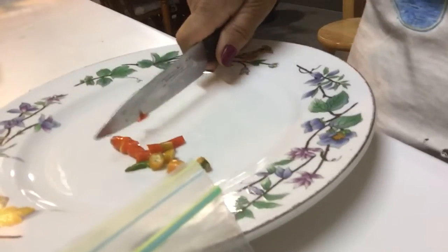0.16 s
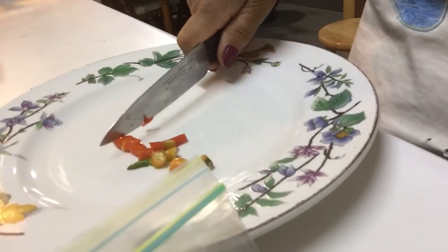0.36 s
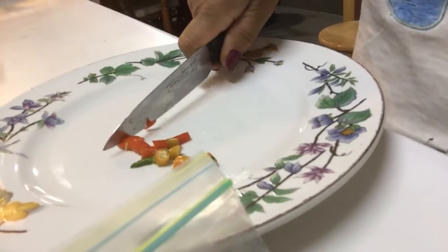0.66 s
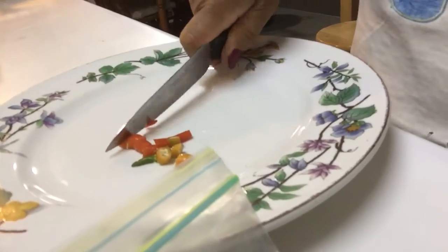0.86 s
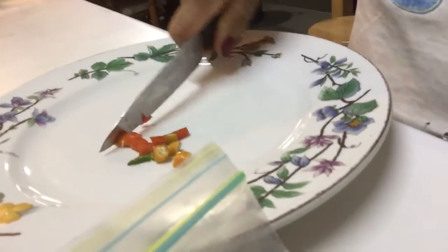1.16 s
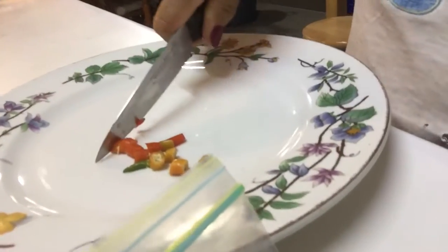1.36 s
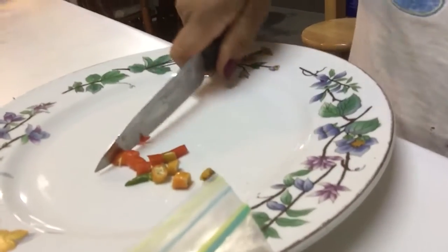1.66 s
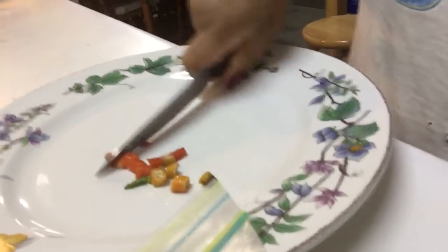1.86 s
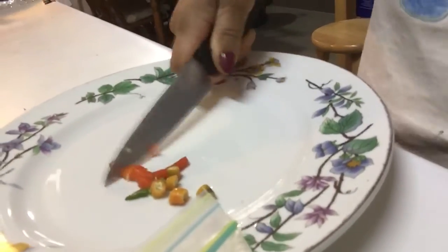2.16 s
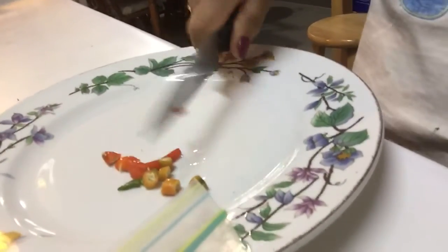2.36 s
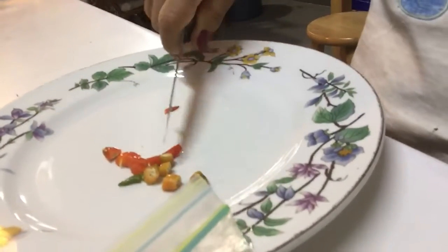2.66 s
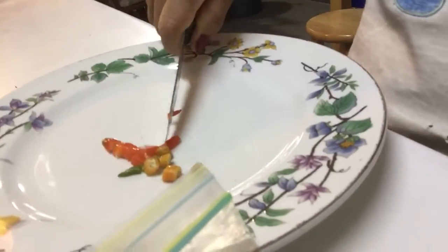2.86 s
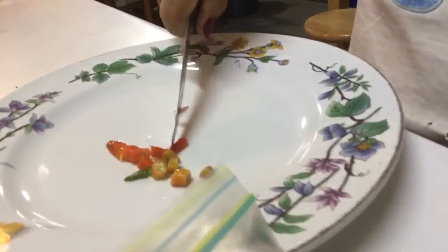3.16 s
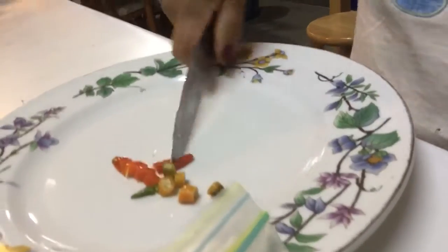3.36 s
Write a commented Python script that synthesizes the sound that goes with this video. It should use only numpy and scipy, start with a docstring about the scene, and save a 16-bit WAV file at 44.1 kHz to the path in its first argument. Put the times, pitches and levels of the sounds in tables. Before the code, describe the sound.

A kitchen knife cuts chili on a porcelain plate, three sharp ringing clacks with faint scrapes between

```python
"""A kitchen knife cuts a chili on a porcelain plate that stands on a table in a small kitchen.
Three times the blade breaks through and hits the plate: decaying sines ring for blade and glaze, the table thuds.
In between the tip ticks and scrapes (grains of friction convolved with a touch), and the chili rasps as
band-passed grains. At MOVE_S the knife moves from the chili's tip to the plate's middle.
Noise gives the room tone and reverberation; the close microphone overloads on the two hardest hits."""
import sys
import numpy as np
from scipy import signal
from scipy.fft import rfft, irfft
from scipy.io import wavfile

SR = 44100
rng = np.random.default_rng(int(sys.argv[2]) if len(sys.argv) > 2 else 0)


def dump_mix(stems):
    """Bounce the given channels to the path in sys.argv[1] as a 16-bit WAV at rate SR."""
    frames = np.atleast_2d(stems).T  # one column per channel
    limited = np.clip(frames, -1, 1)  # hard clip at full scale
    pcm = np.round(limited * 32767).astype(np.int16)
    wavfile.write(sys.argv[1], SR, pcm)


N = 154350
T = np.arange(SR // 2) / SR  # half a second for every ring and tail

# spectrum of the steady air, only its shape counts: pitch_hz [Hz], density_db [dB per Hz]
AIR_SPECTRUM = [(15, -42.5), (25, -11.5), (48, -11.5), (86, -4.5), (126, -3), (260, -7), (359, 0),
                (389, -7), (421, -8.5), (762, -17), (945, -17.5), (1800, -21), (5730, -27), (15500, -37)]
AIR_DB, HUM_DB = -66, -80
HUM_HZ, HUM_WIDTH_HZ = 357.2, 8

# kitchen reverberation: pitch_hz [Hz], level_db [dB against the direct sound], t60_s [s]
ROOM_REVERB = [(99.5, -23, .35), (400, -13.5, .35), (1000, -17.5, 0.17), (1980, -27.5, 0.5),
               (4000, -24, 0.16), (8000, -21.5, 0.32), (15000, -18.5, 0.11)]
ROOM_DELAY_S, EARLY_DB, EARLY_T60_S = 0.006, -2.5, 0.03  # EARLY_DB is against the late tail

# the table's boom: pitch_hz [Hz], level_db [dB], t60_s [s]
TABLE_MODES = [(56.3, -2.5, .16), (74, 3, 0.15), (110, -1, .13), (145, -5.5, 0.18)]
# the plate's low knock: pitch_hz [Hz], level_db [dB], t60_s [s]
KNOCK_MODES = [(265, 1.5, .09), (454, 4, .028), (530, -4, .025), (680, 0, .032), (1214, 0.5, 0.014),
               (1380, -2, .02)]
# the hand's weight goes through the plate into the table:
# start_s [s], boom_db [dB], boom_edge_hz [Hz], knock_db [dB]
TABLE_THUDS = [(0.0, -52, 70.6, -78), (0.7148, -34, 198, -34), (1.562, -60, 72, -75),
               (1.813, -40.5, 51, -77), (1.9815, -28.5, 405, -26.5), (2.225, -41.5, 69.4, -58.5),
               (2.873, -50, 90.3, -61.5), (3.302, -24, 90, -29)]
THUD_RISE_CYCLES = 0.61

# skin and flesh of the chili rasp along the blade:
# start_s [s], length_s [s], level_db [dB], low_edge_hz [Hz], high_edge_hz [Hz]
CHILI_RASPS = [(0.702, .02, -48, 500, 1900), (0.702, .026, -66, 9500, 16000), (0.845, .06, -67, 1100, 3500),
               (1.97, .12, -53, 1000, 2500), (2.155, .085, -59, 700, 2600), (2.2, .1, -65, 3500, 8500),
               (2.212, .065, -67, 8000, 15500), (3.273, .026, -59, 1200, 3500),
               (3.28, .23, -56, 1500, 4000)]
RASP_GRAINS_PER_S = 3000

# the plate's ringing modes:
# pitch_hz [Hz], tip_db [dB, touched at the chili's tip], middle_db [dB, touched near the middle], t60_s [s]
PLATE_MODES = [(1760, -13, -11.5, 0.041), (2165, -12.5, -14, 0.046), (2565, -22, -14.5, .03),
               (2763.4, -2.5, -3.5, 0.048), (3344, -12.5, -9.5, 0.031), (3677, -22.5, -16, .035),
               (3934, -16, -14, 0.06), (4170, -23, -9.5, .025), (4362, -12, -7.5, .035),
               (4750, -24, -24, .05), (5800, -9.5, -20.5, .055), (6103, -20, -17, .035),
               (7760, -18, -29, .05), (8040, -18, -26, 0.037), (9950, -27, -29, .035),
               (10720, -26.5, -30, .035), (11880, -30, -25, .05)]
MOVE_S = 2.5
BLADE_RISE_S, PLATE_RISE_S = 0.00067, 0.00077
CRACK_DB, CRACK_T60_S = -8.5, 0.0083

# the blade lands on the plate:
# start_s [s], level_db [dB], blade_pitch_hz [Hz], blade_t60_s [s], plate_ring_db [dB], contact_edge_hz [Hz]
BLADE_STRIKES = [(0.7086, -26.5, 2110, .03, -6, 2520), (0.7128, -25, 1976, 0.039, 2, 6500),
                 (1.9707, -16, 2072, 0.06, -11.5, 3500), (1.98, 7, 1934, 0.027, -22.5, 12400),
                 (2.8701, -31.5, 1970, 0.038, -2, 2300), (3.2775, -35.5, 1980, 0.026, -1, 3500),
                 (3.2963, -5, 2065, 0.029, -1.5, 2440), (3.3011, 13.5, 1943, 0.016, -12.5, 12000)]
# the tip slips a little under pressure: start_s [s], level_db [dB]
TIP_TICKS = [(0.8315, -37.5), (0.8648, -30), (0.8755, -40), (0.8895, -49), (0.9255, -46.5), (1.2173, -33.5),
             (1.2355, -40.5), (1.555, -40), (1.7042, -39), (1.7466, -36.5), (1.7545, -35.5), (1.9571, -33),
             (2.2385, -28.5), (2.2659, -55.5), (2.9715, -37), (3.0187, -42.5), (3.1469, -43.5),
             (3.1654, -42), (3.1923, -39.5), (3.2038, -37.5)]
TICK_HZ, TICK_HZ_SPREAD = 1949, 0.01239  # spread as a fraction of the pitch
TICK_T60_S, TICK_PLATE_DB, TICK_EDGE_HZ = 0.019, -16.5, 5000
# the edge drags over the glaze:
# start_s [s], length_s [s], level_db [dB], plate_ring_db [dB], contact_edge_hz [Hz]
EDGE_SCRAPES = [(0.544, 0.25, -70.5, -5.5, 3550), (0.697, 0.019, -36.5, -5.5, 3080),
                (0.787, .18, -59, -9.5, 3980), (1.221, 0.13, -76, -9, 2510), (1.727, 0.079, -58, -9, 3280),
                (1.782, 0.48, -66, -7, 2500), (2.067, .08, -55, -15.5, 2500),
                (2.202, 0.086, -50, -10.5, 7105), (2.923, .17, -63.5, -4, 3940),
                (3.091, 0.21, -62.5, -4.5, 4400)]
SCRAPE_HZ, SCRAPE_T60_S, SCRAPE_GRAINS_PER_S = 1927, 0.026, 2400
GRAIN_SPREAD_DB, CLUMPS_PER_S, CLUMP_DB = 4.5, 110, 2.6

OVERLOAD = 1.0  # ceiling of the flattened peaks, full scale
TREBLE_STOP_HZ = 17000


def from_db(db):
    """Decibels to gain."""
    return 10 ** (np.asarray(db) / 20)


def rms_one(x):
    """Scale to unit rms."""
    return x / np.sqrt(np.mean(x ** 2) + 1e-20)


def at_level(x, length_s, db):
    """Give a stroke its rms level, its energy averaged over length_s."""
    mean_square = np.sum(x ** 2) / (length_s * SR)
    return from_db(db) * x / np.sqrt(mean_square + 1e-20)


def add(out, start_s, x):
    """Mix x into out from start_s on."""
    i = max(int(start_s * SR), 0)
    out[i:i + len(x)] += x[:N - i]


def fade(t60):
    """Exponential decay that loses 60 dB in t60 seconds."""
    return np.exp(-np.log(1000) * T / t60)


def mode(hz, t60, rise_s):
    """A resonance that swells quickly and dies away."""
    swell = 1 - np.exp(-T / rise_s)
    return np.sin(2 * np.pi * hz * T) * fade(t60) * swell


def soften(x, edge_hz):
    """A softer contact carries less treble."""
    low_pass = signal.butter(2, min(edge_hz, 0.45 * SR), fs=SR, output="sos")
    return signal.sosfilt(low_pass, x + 1e-18)


def band(x, low_hz, high_hz):
    """Keep the band between two edges."""
    band_pass = signal.butter(3, [low_hz, min(high_hz, 0.48 * SR)], "band", fs=SR, output="sos")
    return signal.sosfilt(band_pass, x)


def at_hz(points, hz, axis=1):
    """Read a column of a table on a log-frequency axis."""
    points = np.array(points)
    return np.interp(np.log(hz + 1e-9), np.log(points[:, 0]), points[:, axis])


def room_tone():
    """Steady air as shaped noise, with the faint hum of an appliance as a narrow band of noise."""
    hz = np.arange(N // 2 + 1) * SR / N
    air_bins, hum_bins = rfft(rng.standard_normal((2, N)))
    air = irfft(air_bins * from_db(at_hz(AIR_SPECTRUM, hz)), N)
    hum = irfft(hum_bins / (1 + ((hz - HUM_HZ) / HUM_WIDTH_HZ) ** 2), N)
    return from_db(AIR_DB) * rms_one(air) + from_db(HUM_DB) * rms_one(hum)


def kitchen(direct):
    """Dense early reflections and a tail that dies at its own pace in each octave."""
    response = 0
    edges_hz = 40 * 2.0 ** np.arange(10)
    early = fade(EARLY_T60_S)
    early = from_db(EARLY_DB) * early / np.linalg.norm(early)
    for low_hz, high_hz in zip(edges_hz, edges_hz[1:]):
        centre_hz = np.sqrt(low_hz * high_hz)
        late = fade(at_hz(ROOM_REVERB, centre_hz, axis=2))
        shape = late / np.linalg.norm(late) + early
        octave_noise = band(rng.standard_normal(len(T)), low_hz, high_hz)
        response = response + from_db(at_hz(ROOM_REVERB, centre_hz)) * octave_noise * shape
    out = np.zeros(N)
    add(out, ROOM_DELAY_S, signal.fftconvolve(direct, response))
    return out


def thud_body(modes):
    """Sum the modes of a heavy body; low ones swell more slowly."""
    return sum(from_db(db) * mode(hz, t60, THUD_RISE_CYCLES / hz) for hz, db, t60 in modes)


def table():
    """Each push makes the table boom; a sudden one also knocks the plate against it."""
    out = np.zeros(N)
    boom = thud_body(TABLE_MODES)
    knock = thud_body(KNOCK_MODES)
    for start_s, boom_db, edge_hz, knock_db in TABLE_THUDS:
        thud = from_db(boom_db) * soften(boom, edge_hz) + from_db(knock_db) * knock
        add(out, start_s, thud)
    return out


def friction(length_s, grains_per_s, taper=1.4):
    """Tiny slips of uneven size that come in clumps, swelling and fading over one stroke."""
    n = int(length_s * SR)
    chance, size, sign = rng.random((3, len(T)))[:, :n]
    clumps = rng.standard_normal(size=200)
    clumps = np.interp(T[:n] * CLUMPS_PER_S, np.arange(len(clumps)), clumps)
    grain_db = GRAIN_SPREAD_DB * np.minimum(-np.log(size + 1e-9), 3)  # few large, many small
    slips = from_db(grain_db + CLUMP_DB * clumps) * np.sign(sign - 0.5)
    grains = (chance < grains_per_s / SR) * slips + 1e-9
    return grains * np.sin(np.pi * np.arange(n) / n) ** taper


def chili():
    """Fine crackle as the blade passes through skin and flesh."""
    out = np.zeros(N)
    for start_s, length_s, db, low_hz, high_hz in CHILI_RASPS:
        grains = np.pad(friction(length_s, RASP_GRAINS_PER_S), (0, SR // 50))  # room for the filter to ring out
        add(out, start_s, at_level(band(grains, low_hz, high_hz), length_s, db))
    return out


def contact(start_s, blade_hz, blade_t60, plate_db, edge_hz):
    """One touch of steel on porcelain: the blade's damped note, the plate's modes there and a short crack."""
    plate = 0
    for k, (hz, tip_db, middle_db, t60) in enumerate(PLATE_MODES):
        db = tip_db if start_s < MOVE_S else middle_db
        plate = plate + (-1) ** k * from_db(db) * mode(hz, t60, PLATE_RISE_S)  # alternating polarity
    crack_noise = band(rng.standard_normal(len(T)), 1000, 13000)
    crack = from_db(CRACK_DB) * crack_noise * fade(CRACK_T60_S)
    blade = mode(blade_hz, blade_t60, BLADE_RISE_S)
    return blade + from_db(plate_db) * soften(plate + crack, edge_hz)


def knife():
    """Hits and ticks are single contacts of blade and plate; a scrape is friction exciting a contact's ring."""
    out = np.zeros(N)
    for start_s, db, hz, t60, plate_db, edge_hz in BLADE_STRIKES:
        add(out, start_s, from_db(db) * contact(start_s, hz, t60, plate_db, edge_hz))
    for start_s, db in TIP_TICKS:
        hz = TICK_HZ * (1 + TICK_HZ_SPREAD * rng.standard_normal())
        tick = contact(start_s, hz, TICK_T60_S, TICK_PLATE_DB, TICK_EDGE_HZ)
        add(out, start_s, from_db(db) * tick)
    for start_s, length_s, db, plate_db, edge_hz in EDGE_SCRAPES:
        ring = contact(start_s, SCRAPE_HZ, SCRAPE_T60_S, plate_db, edge_hz)
        drag = signal.fftconvolve(friction(length_s, SCRAPE_GRAINS_PER_S), ring)
        add(out, start_s, at_level(drag, length_s, db))
    return out


def scene():
    """Knife, chili and table in the kitchen."""
    direct = table() + chili() + knife()
    return (room_tone() + kitchen(direct) + direct)[None]


def record(dry, knee_order=4):
    """The microphone rounds the hardest peaks off below OVERLOAD, and the top treble is cut."""
    flattened = dry / (1 + np.abs(dry / OVERLOAD) ** knee_order) ** (1 / knee_order)
    treble_cut = signal.cheby2(12, 60, TREBLE_STOP_HZ, fs=SR, output="sos")
    return signal.sosfilt(treble_cut, flattened)


dry = scene()
out = record(dry)
dump_mix(out)
```